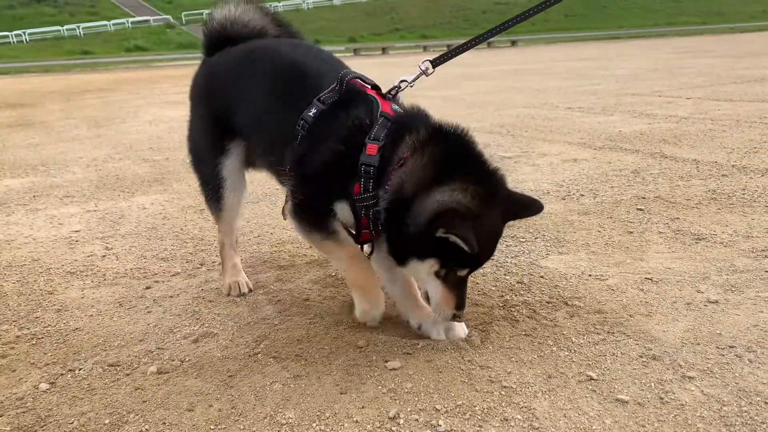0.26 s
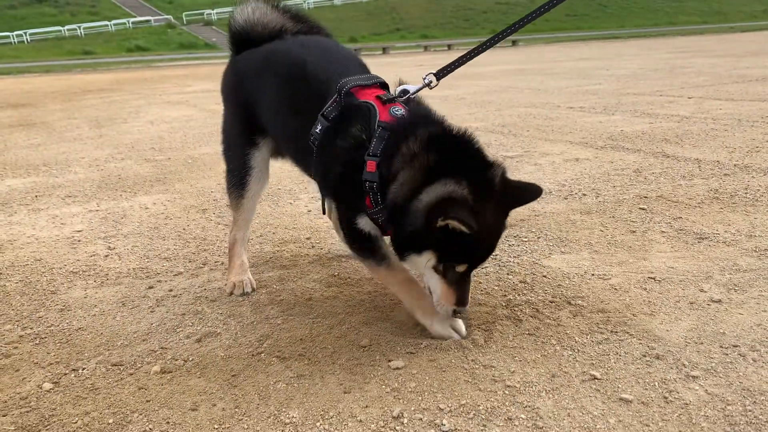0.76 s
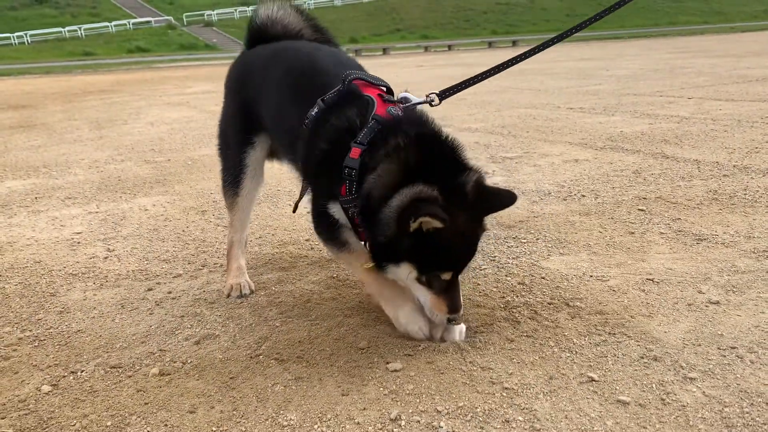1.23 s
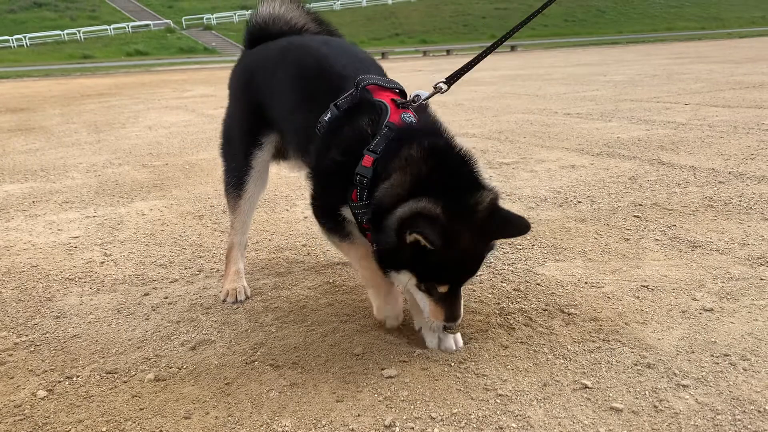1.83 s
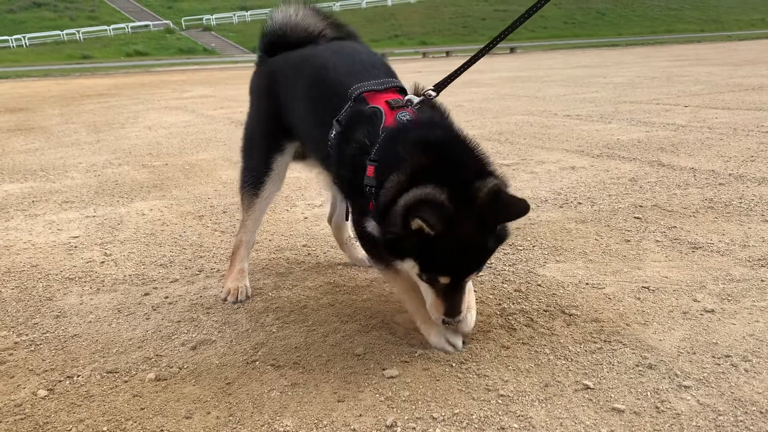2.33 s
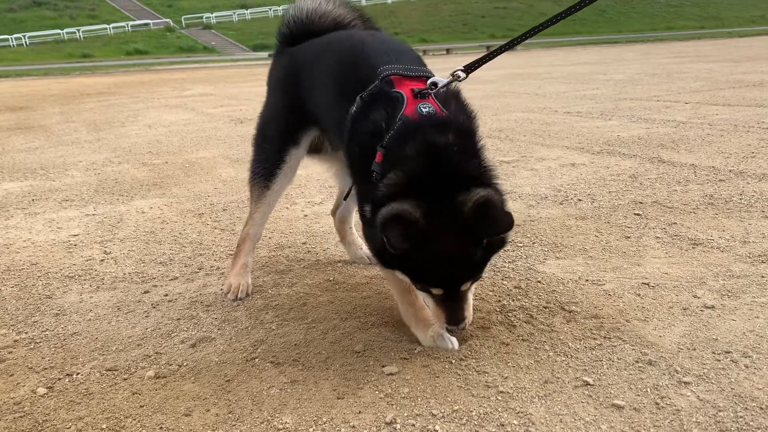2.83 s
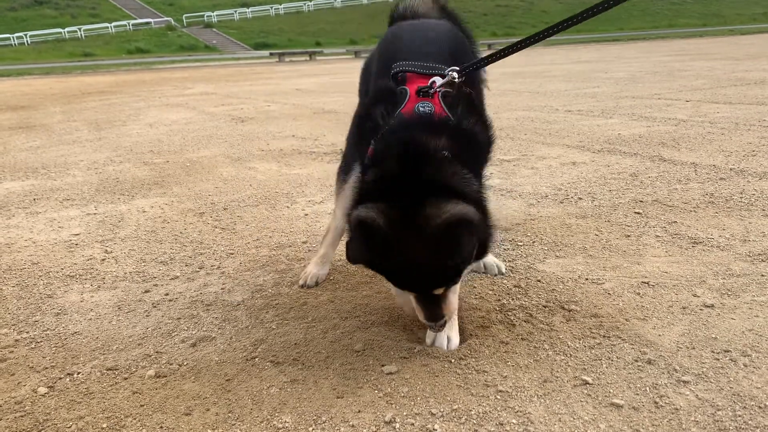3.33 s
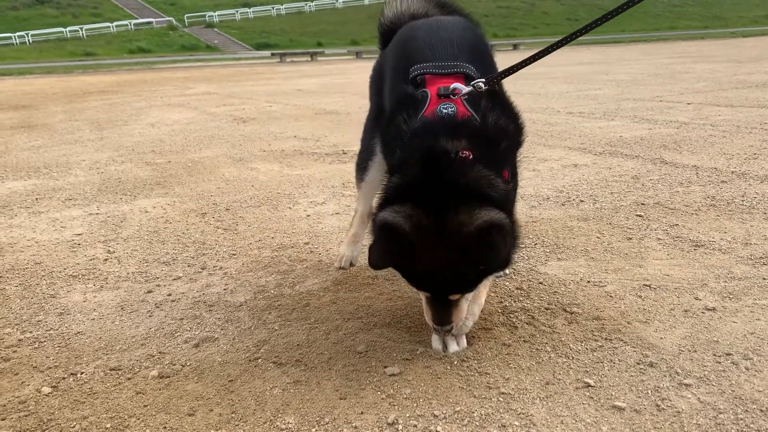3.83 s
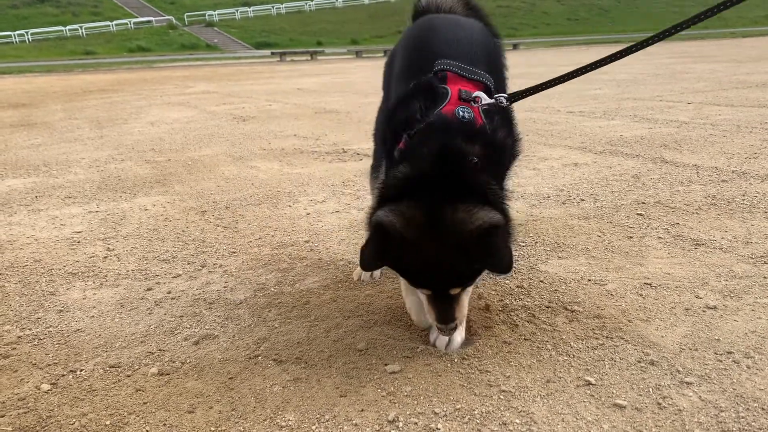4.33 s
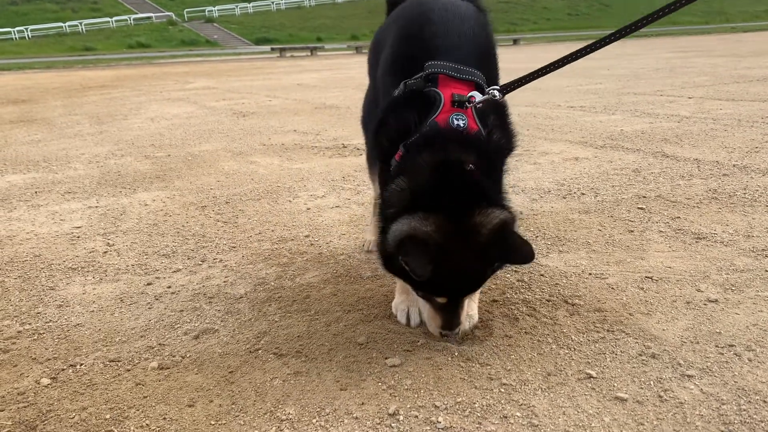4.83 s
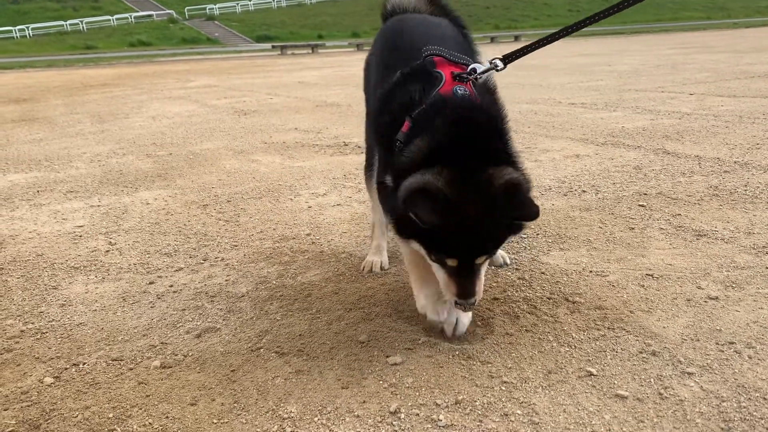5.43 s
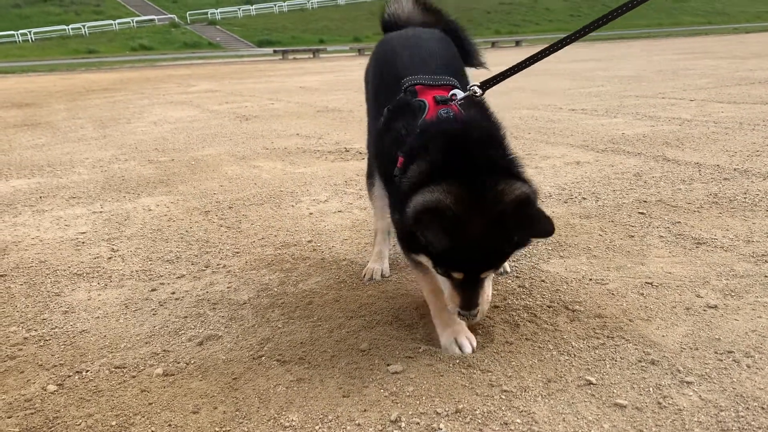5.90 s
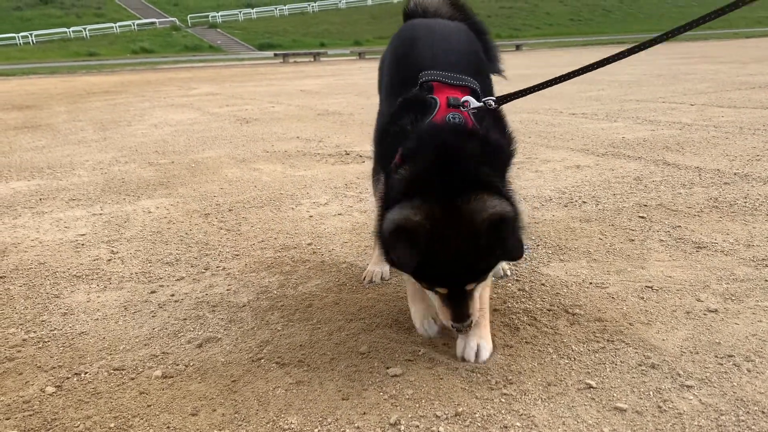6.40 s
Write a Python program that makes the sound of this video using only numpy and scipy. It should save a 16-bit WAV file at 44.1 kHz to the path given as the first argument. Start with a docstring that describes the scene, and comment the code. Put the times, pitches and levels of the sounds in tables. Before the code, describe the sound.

Close stereo pickup of claws scratching gravelly sand in an open place: crisp, swelling and dying sprays in a brisk, slightly uneven rhythm. Small stones click, one knock standing out near the middle, and a metal clasp tinkles lightly. Low wind flutters and bumps against the microphone throughout, above dull distant traffic-like drone and soft hiss. After a brief pause in the scratching, a bird chirps quickly and the digging continues to the end.

```python
"""A dog on a lead digs at dry gravelly ground: each paw stroke is a swelling and dying spray of
ringing grains, fine for sand and coarse for gravel. Pebbles click as short knocks with a bright tick,
and the metal clasp of the lead tinkles as a set of decaying modes. Wind, made of coloured noise and
sagging low swings, buffets two microphone ports over a distant drone of dull grains and faint hiss.
A small bird twitters once in gliding whistles."""
import sys
import numpy as np
from scipy import signal
from scipy.fft import rfft, irfft, next_fast_len
from scipy.io import wavfile
from scipy.ndimage import uniform_filter1d

SR = 44100
rng = np.random.default_rng(int(sys.argv[2]) if len(sys.argv) > 2 else 0)


def generate_wav(sig):
    """Save sig (samples, or channels by samples) to the path in sys.argv[1] as 16-bit PCM at SR."""
    pcm = np.round(np.clip(np.atleast_2d(sig).T, -1, 1) * 32767).astype(np.int16)
    wavfile.write(sys.argv[1], SR, pcm)


N = 293706
TIME = np.arange(N) / SR
SIZE = next_fast_len(N)
FREQ = np.maximum(np.fft.rfftfreq(SIZE, 1 / SR), 1)

# paw strokes: (start [s], nominal length [s], sand level [dB], gravel level [dB])
STROKES = [(0, 0.076, -52.5, -53), (0.136, 0.1, -52, -49), (0.32, 0.067, -47.5, -54),
           (0.467, 0.077, -47.5, -49), (0.614, 0.052, -43.5, -49.5), (0.763, 0.071, -49, -53.5),
           (0.905, 0.074, -48, -56), (1.036, 0.14, -46, -52.5), (1.203, 0.077, -48, -50.5),
           (1.386, 0.045, -47.5, -46.5), (1.46, 0.061, -54, -77), (1.547, 0.062, -50.5, -52.5),
           (1.727, 0.04, -46.5, -47.5), (1.852, 0.06, -48, -50), (2.02, 0.084, -48.5, -51.5),
           (2.14, 0.093, -40, -47.5), (2.302, 0.08, -50, -52.5), (2.47, 0.049, -43.5, -50.5),
           (2.593, 0.1, -52.5, -55), (2.76, 0.06, -47, -51.5), (2.926, 0.063, -49, -53.5),
           (3.07, 0.045, -46.5, -50.5), (3.209, 0.088, -52, -55.5), (3.348, 0.076, -43.5, -48.5),
           (3.452, 0.059, -53.5, -59.5), (3.52, 0.064, -51, -56), (3.662, 0.066, -49.5, -51.5),
           (3.834, 0.063, -53, -52.5), (3.991, 0.082, -50, -55), (4.187, 0.056, -55, -54.5),
           (4.329, 0.051, -46, -49), (4.503, 0.16, -47, -54.5), (4.802, 0.18, -76, -71.5),
           (5.295, 0.054, -64.5, -67), (5.381, 0.086, -50, -50.5), (5.564, 0.075, -44, -52.5),
           (5.767, 0.062, -48, -49.5), (5.914, 0.087, -52, -54.5), (6.086, 0.061, -48, -49.5),
           (6.242, 0.069, -52.5, -54), (6.416, 0.053, -52.5, -54.5), (6.592, 0.071, -53, -58.5)]
# colour of sprayed sand, shared by the clasp's crack: (frequency [Hz], relative density [dB per Hz])
SAND_COLOUR = [(3000, -8.5), (5000, -33), (6200, -11.5), (7500, -15.5), (8500, -3.5), (10000, 0),
               (11500, -5.5), (12500, -6.5), (14000, -9.5), (15700, -10.5), (16050, -61)]


def undb(db):
    """Gain of a level in dB."""
    return 10 ** (np.asarray(db) / 20)


def across(table):
    """Columns of a (frequency, ..) table, interpolated over log frequency."""
    hz, *columns = np.transpose(table)
    return [np.interp(np.log(FREQ), np.log(hz), column) for column in columns]


def along(table):
    """Columns of a (time, ..) table, interpolated over the time axis."""
    s, *columns = np.transpose(table)
    return [np.interp(TIME, s, column) for column in columns]


def colour(x, spectrum):
    """Gives a white signal a spectrum at the same power; it keeps falling past its last point."""
    gain = undb(across(spectrum)[0])
    gain = gain * np.minimum(1, spectrum[-1][0] / FREQ) ** 4
    gain = gain / np.sqrt(np.mean(gain ** 2))
    return irfft(rfft(x, SIZE) * gain, SIZE)[..., :N]


def ports(three, table):
    """Row 0 reaches both ports with a phase lag; rows 1 and 2 reach one port each."""
    lead, pan_db, share = across(table)
    share = np.clip(share, 0, 1)
    common, *own = rfft(three, SIZE)
    heard = []
    for k, side in enumerate((1, -1)):  # left, right
        together = np.sqrt(share) * np.exp(.5j * side * lead) * common
        alone = np.sqrt(1 - share) * own[k]
        heard.append(irfft(undb(side * pan_db / 2) * (together + alone), SIZE)[:N])
    return np.array(heard)


def walk(rate):
    """Random levels held 1 / rate s and slewed twice; spread near 1."""
    k = int(SR / rate)
    held = np.repeat(rng.standard_normal(N // k + 1), k)
    return 2.42 * uniform_filter1d(uniform_filter1d(held, k), k)[:N]


def grains(low_hz, top_hz, rate, scatter_db, cycles, patchy_db, count):
    """Three rows of clicks ringing a few cycles, each pitch in its own patches; dense as unit white noise."""
    out = 0
    size = int(rate * N / SR)
    for hz in np.geomspace(low_hz, top_hz, count):
        clicks = np.zeros((3, N))
        at = rng.integers(0, N, (3, size))
        # a few grains strike far harder than the rest
        force = rng.standard_normal((3, size)) * undb(scatter_db * rng.exponential(size=(3, size)))
        np.put_along_axis(clicks, at, force, axis=1)
        ring = signal.lfilter(*signal.iirpeak(hz, cycles, SR), clicks)
        out = out + ring * np.sqrt(hz / np.mean(ring ** 2)) * undb(patchy_db * walk(55))
    width = np.mean((FREQ > low_hz) & (FREQ < top_hz))
    return out * np.sqrt(width / np.mean(out ** 2))


def add(out, s, sound):
    """Mixes a short sound in at a time."""
    i = int(s * SR)
    out[..., i:i + sound.shape[-1]] += sound[..., :max(N - i, 0)]


def drone(hiss_mean_db=-59.5, hiss_follows=0.12):
    """A dull far drone, perhaps traffic, whose bands waver alone, and a faint smooth hiss above it."""
    # drift of the drone: (time [s], level [dB])
    drone_level = [(0, -43.5), (1.5, -41.5), (2.2, -41), (2.7, -44.5), (3.3, -45), (4.4, -45.5),
                   (5.05, -48), (6.66, -50)]
    # colour of the drone: (frequency [Hz], relative density [dB per Hz])
    drone_colour = [(150, -4.5), (300, -7.5), (480, 1), (700, -3.5), (950, -10.5), (1300, -24.5),
                    (2500, -81)]
    # colour of the hiss: (frequency [Hz], relative density [dB per Hz])
    hiss_colour = [(600, -8), (1200, -4), (2000, -3), (3000, -12), (4500, -17.5), (6000, -27.5),
                   (8000, -41.5), (12000, -41), (14000, -62)]
    db, = along(drone_level)
    bands = grains(144.4, 2655, 1500, scatter_db=1.1, cycles=5.5, patchy_db=1.5, count=12)
    low = colour(bands, drone_colour) * undb(db + 0.5 * walk(3.98))
    # hiss_follows: dB the hiss moves per dB of drone
    hiss_db = hiss_mean_db + hiss_follows * (db - db.mean())
    hiss = colour(rng.standard_normal((3, N)), hiss_colour) * undb(hiss_db + 0.4 * walk(6.3))
    return low + hiss


def wind(flutter_mean_db=-46, flutter_follows=0.78, cycles=1.09, edge_s=0.0095, brief=2.23, snap_db=11, sag=0.1):
    """Turbulent rumble and flutter; single eddies slap the ports and swing out, sagging in pitch."""
    # wind on the ports: (time [s], rumble level [dB])
    rumble_level = [(0, -35.5), (.2, -38), (.33, -29.5), (.76, -34), (1.2, -36.5), (2.11, -36),
                    (2.39, -39.5), (2.76, -37), (3, -45), (3.11, -36.5), (3.76, -40), (4.12, -37),
                    (4.25, -40.5), (4.67, -40), (4.9, -40), (5.25, -44.5), (5.4, -37), (6.25, -38.5),
                    (6.66, -35.5)]
    # colour of the rumble: (frequency [Hz], relative density [dB per Hz])
    rumble_colour = [(15, -51), (28, -22), (45, -3.5), (60, 0), (100, -4), (140, -10), (250, -24),
                     (500, -78)]
    # colour of the flutter: (frequency [Hz], relative density [dB per Hz])
    flutter_colour = [(60, -28), (120, -4.5), (160, 1), (250, -1.5), (350, -9.5), (600, -15.5), (1200, -51)]
    # colour of an eddy's sharp edge: (frequency [Hz], relative density [dB per Hz])
    edge_colour = [(80, -44.5), (170, -3.5), (280, -3), (450, -9.5), (800, -26), (1500, -51)]
    # eddies: (time [s], swing level [dB], mean pitch up to the crest at `cycles` turns [Hz], edge level [dB])
    buffets = [(0.297, -27, 112, -34.5), (.326, -27, 59.6, -27.5), (0.37, -35, 60, -33),
               (.556, -28, 105, -31.5), (.632, -27.5, 101.4, -31.5), (.706, -23, 64, -54),
               (0.914, -27.5, 90.5, -52), (0.966, -28, 85.5, -40), (1.575, -29, 87.4, -31.5),
               (1.755, -33, 100, -48), (2.129, -25.5, 71.5, -40.5), (2.45, -24.5, 66, -66),
               (2.735, -28.5, 105.6, -31), (3.025, -40, 68.6, -43), (3.277, -27, 103, -37.5),
               (3.446, -38, 152, -38.5), (3.614, -26, 114, -64), (3.952, -34, 110, -40),
               (4.073, -26, 73, -42), (4.194, -30, 99, -41), (4.466, -34, 57.7, -44),
               (4.856, -29, 149, -34), (4.866, -26.5, 66.7, -64), (5.073, -45, 111, -46),
               (5.355, -31, 112, -46), (5.453, -32, 58.5, -48), (5.515, -31.5, 54, -43),
               (5.888, -29.5, 90, -37.5), (6.595, -30, 69, -44.5)]
    db, = along(rumble_level)
    rumble = colour(rng.standard_normal((3, N)), rumble_colour) * undb(db + 1.28 * walk(14))
    # flutter_follows: dB the flutter moves per dB of rumble
    flutter_db = flutter_mean_db + flutter_follows * (db - db.mean())
    flutter = colour(rng.standard_normal((3, N)), flutter_colour) * undb(flutter_db + 1.76 * walk(30))
    eddies, edges, snaps = np.zeros((3, N)), np.zeros(N), np.zeros(N)
    t = TIME[:5000]
    for s, swing_db, hz, edge_db in buffets:
        crest_s = cycles / hz
        turn = hz * t / cycles  # 1 at the crest of the swing
        phase = 2 * np.pi * rng.random() + 0.64 * rng.standard_normal((3, 1))
        swing = np.cos(2 * np.pi * hz * t * (1 + sag) / (1 + sag * turn) + phase)
        envelope = (turn * np.exp(1 - turn)) ** brief
        add(eddies, s, undb(swing_db) * swing * envelope)
        add(edges, s, undb(edge_db) * np.minimum(turn, 1) * np.exp(-((t - crest_s) / edge_s) ** 2))
        # the pressure also snaps once at the crest
        add(snaps, s + crest_s, undb([edge_db + snap_db]) * np.sign(np.cos(phase.mean())))
    sharp = edges * colour(rng.standard_normal((3, N)), edge_colour) + colour(snaps, edge_colour)
    return rumble + flutter + eddies + sharp


def bird(pan_db=-3):
    """Quick, slightly hoarse gliding whistles, a little to the right."""
    # notes: (start [s], length [s], start pitch [Hz], end pitch [Hz], level before panning [dB])
    notes = [(5.289, .016, 4300, 5600, -64), (5.302, .012, 5600, 3800, -65), (5.316, .016, 4600, 4250, -64),
             (5.343, .018, 3550, 3500, -65), (5.358, .014, 3700, 4400, -68)]
    out = np.zeros(N)
    for s, length, hz, end_hz, db in notes:
        ramp = np.linspace(0, 1, int(length * SR))
        hoarse_db = 2 * walk(470)[:len(ramp)]
        waver_hz = 90 * walk(560)[:len(ramp)]
        glide_hz = hz + (end_hz - hz) * ramp + waver_hz
        whistle = np.sin(2 * np.pi * np.cumsum(glide_hz) / SR)
        add(out, s, undb(db + hoarse_db) * np.sin(np.pi * ramp) * whistle)
    return out * undb([[pan_db / 2], [-pan_db / 2]])


def rattle(under_db=-15, shiver_s=0.047, count=3):
    """Faint extra clasp taps shaken loose by each stroke, louder with a strong one."""
    chance = rng.random((len(STROKES), count, 3))
    start, _, sand_db, _ = np.transpose(STROKES)[..., None]
    s = start + shiver_s * chance[..., 0]
    db = sand_db + under_db + 12 * (chance[..., 1] - .5)
    ring_db = -25 + 15 * chance[..., 2]
    return list(zip(s.ravel(), db.ravel(), ring_db.ravel()))


def clasp(crack_db=-6, gentle_db=-51.0, choke_s=0.014):
    """Each tap rings the same metal modes in new proportions, with a noisy crack of contact."""
    # modes of the clasp: (frequency [Hz], relative level [dB], 60 dB decay [s])
    clasp_modes = [(4759, -23, .15), (9929, 0, .13), (11150, -9, .025), (12160, -13, .04)]
    # modes of the harness ring it knocks against: (frequency [Hz], relative level [dB], 60 dB decay [s])
    ring_modes = [(6943, 2, .12), (14420, 2, .04)]
    # taps: (time [s], level [dB], ring over clasp [dB])
    taps = [(.0573, -37, -19), (.2748, -48, -29), (.298, -45.5, -31), (.335, -48, -25), (.3576, -44, -21),
            (.4725, -28.5, -28), (.6365, -27.5, -14), (.652, -39, -25), (1.017, -41.5, -25),
            (1.1029, -45.5, -15), (1.144, -39, 7), (1.157, -47.5, 12), (1.2, -49, -14),
            (1.2855, -47.5, -27), (1.463, -47, -17), (1.4916, -41, -6), (1.508, -50, 6), (1.522, -52, -25),
            (1.799, -51.5, -25), (1.8328, -48, 9), (1.842, -46, -25), (2.3261, -43, -12), (2.368, -46, -26),
            (2.4644, -34, 1), (2.535, -53, -25), (2.751, -46, -23), (2.977, -48, -24), (3.036, -54.5, -25),
            (3.0839, -42, -16), (3.166, -53, -25), (3.5309, -48.5, -25), (3.6581, -43, -17),
            (3.885, -53, -25), (3.9245, -54, -20), (3.94, -63, -25), (3.9558, -56, -25),
            (4.3505, -37.5, -11), (4.383, -55, -25), (4.443, -48.5, -11), (4.46, -58, -25),
            (4.799, -57, -34), (5.4178, -37, -8), (5.7957, -46, -3), (6.1639, -50, -23),
            (6.488, -47.5, -25), (6.5553, -47.5, -30)]
    tones, cracks = np.zeros((3, N))[:2]
    t = TIME[:3000, None]
    hz, mode_db, t60 = np.transpose(clasp_modes + ring_modes)
    of_ring = np.arange(len(hz)) >= len(clasp_modes)
    for s, db, ring_db in list(taps) + rattle():
        chance = rng.standard_normal((3, len(hz)))
        share = undb(mode_db + 0.55 * chance[0] + ring_db * of_ring)
        # gentle taps wake the highest modes less
        share = share * undb(0.325 * min(db - gentle_db, 0) * (hz > clasp_modes[1][0]))
        pitch = hz * (1 + 0.00072 * chance[1])
        ring = share * np.sin(2 * np.pi * pitch * t + 3 * chance[2]) * 1000 ** (-t / t60)
        onset = 1 - np.exp(-t / .0008)
        # the parts touch again after a moment, which chokes the ring
        choke = 1 + np.exp((t - choke_s * (1 + .25 * chance[0, 0])) / .003)
        add(tones, s, undb(db) * (ring * onset / choke).sum(axis=1))
        crack = rng.standard_normal(len(t)) * 1000 ** (-t[:, 0] / 0.024)
        add(cracks, s, undb(db + crack_db) * crack)
    return np.tile(tones + colour(cracks, SAND_COLOUR), (3, 1))


def pebbles(body_hz=3100):
    """Claws knock single pebbles: a dry, fast-dying stony knock and a bright tick."""
    # knocks: (time [s], body level [dB], treble over body [dB])
    knocks = [(.165, -33, -12), (0.472, -40, 3), (.6149, -46, 12), (.7627, -33, -9), (1.0595, -32, -14),
              (1.1432, -46, 14), (1.3837, -56, 2), (1.728, -42, -13), (1.8325, -47, 14), (2.172, -43, 6),
              (2.465, -42, 15), (2.5643, -32, -19), (2.578, -39, -10), (2.8923, -21.5, -15),
              (2.8958, -28, -19), (2.908, -32, -14), (2.9376, -42, 11), (3.0669, -41, -3),
              (3.4802, -35.5, 6.5), (3.831, -42, -3), (4.1922, -36.5, -12), (4.3514, -35, -4),
              (5.3965, -33, -15), (5.4615, -37, -20), (5.474, -28, -14), (5.4775, -27, -24),
              (5.4835, -33, -20), (5.754, -35, 1), (6.077, -44, 15), (6.1188, -38, -17), (6.414, -35.5, 1),
              (6.584, -39, -12.5)]
    out = np.zeros((3, N))
    t = TIME[:1000]
    for (s, db, treble_db), pitch in zip(knocks, rng.standard_normal(len(knocks))):
        body = np.sin(2 * np.pi * body_hz * (1 + .04 * pitch) * t) * 1000 ** (-t / .004)
        # an impulse and a burst of noise
        strike = (2.2 * (t == 0) + 0.86 * rng.standard_normal(len(t))) * 1000 ** (-t / 0.0044)
        tick = signal.lfilter(*signal.iirpeak(7500, .75, SR), strike)
        add(out, s, undb(db) * (body + undb(treble_db) * tick))
    return out


def digging(rise_share=0.42, trickle_db=-15, trickle_t60_s=0.3, drag_s=0.0038, bite=1.06, square=2.31,
            crackle_db=-9):
    """Every stroke swells and dies as a spray of grains; thrown sand trickles down after it."""
    # colour of dragged gravel: (frequency [Hz], relative density [dB per Hz])
    gravel_colour = [(600, -6.5), (1200, 2.5), (1900, -1.5), (2400, -7), (3100, -1), (4000, -5.5),
                     (5200, -10), (6500, -10), (9000, -11)]
    sand, gravel = np.zeros(N), np.zeros(N)  # power envelopes
    for s, length, sand_db, gravel_db in STROKES:
        rise, fall = rise_share * length, (1 - rise_share) * length
        since = TIME - s - rise
        sand_span = np.where(since < 0, rise, fall)
        sand += undb(2 * sand_db) * np.exp(-(abs(since) / sand_span) ** square)
        # the claws reach the gravel a moment after the pads stir the sand
        gravel_span = np.where(since < drag_s, rise, fall)
        gravel += undb(2 * gravel_db) * np.exp(-(bite * (since - drag_s) / gravel_span) ** 2)
    keep = np.exp(-2 * np.log(1000) / (trickle_t60_s * SR))
    trickle = undb(2 * trickle_db) * signal.lfilter([1 - keep], [1, -keep], sand)
    # the claws catch and slip, so the spray comes in lumps
    slip = walk(70)
    spray = sand * undb(2.0 * slip)
    # sparser, drier clicks of larger stones cracking loose
    crackle = undb(crackle_db) * grains(1500, 7000, 45, scatter_db=2.0, cycles=2.1, patchy_db=1.0, count=5)
    fine = grains(3440, 18700, 1200, scatter_db=1.5, cycles=8.7, patchy_db=2.5, count=14)
    coarse = grains(950, 8080, 600, scatter_db=1.65, cycles=15.3, patchy_db=1.52, count=20)
    sprayed = colour(fine * np.sqrt(spray + trickle), SAND_COLOUR)
    dragged = colour((coarse + crackle) * np.sqrt(gravel) * undb(1.45 * slip), gravel_colour)
    return sprayed + dragged


def scene(rasp_hz=5250, rasp_sharpness=3.5):
    """Near sounds from the ground and far sounds with the wind meet the two ports differently."""
    # ports, near sound: (frequency [Hz], left phase lead [rad], left minus right [dB], share in common [0-1])
    near_ports = [(600, -1.8, 0, .5), (1500, -2.8, 0, .5), (2000, -6.3, -1, .6), (3000, -5.3, -2, .8),
                  (4000, -6.2, -1, .75), (4500, -5.9, -1, .4), (4850, -3.7, -.5, .7),
                  (5600, -3.2, -.5, .93), (5900, -4.8, -1, .15), (6200, -6.2, 0, .45), (6900, -6.3, 0, .65),
                  (7400, -7.8, 0, .3), (8200, -9.3, 0, .995), (8900, -9.6, 0, .995), (10600, -12.4, 0, .98),
                  (11500, -12.8, 0, .98), (12500, -14.6, 0, .8), (13000, -15.6, 0, .995),
                  (13900, -15.9, 0, .995), (15000, -18.4, 0, .8), (15700, -18.85, 0, .99)]
    # ports, wind and far sound: (frequency [Hz], left phase lead [rad], left minus right [dB], share [0-1])
    far_ports = [(60, -0.5, 0.17, 0.87), (252, 0.5, 0.028, 0.51), (470, -1, .5, 0.45), (737, -2, 0.7, 0.41),
                 (1840, -2, 0.62, 0.54), (2560, -1, -.5, 0.21), (8000, 6, 0.08, 0.4)]
    # lift of the rasp band at the right port as the dog stands side on: (time [s], lift [dB])
    rasp_lift = [(0, 10.5), (1, 6), (2.3, 1), (4.7, -3), (5.4, 2.5), (6.66, 4)]
    left, right = ports(digging() + pebbles() + clasp(), near_ports)
    rasp = signal.lfilter(*signal.iirpeak(rasp_hz, rasp_sharpness, SR), right)
    near = np.array([left, right + (undb(along(rasp_lift)[0]) - 1) * rasp])
    return near + ports(wind() + drone(), far_ports) + bird()


def record(dry, top_hz=16400):
    """The recorder cuts the top with a steep low-pass."""
    return signal.sosfilt(signal.ellip(8, .2, 70, top_hz, fs=SR, output="sos"), dry)


dry = scene()
out = record(dry)
generate_wav(out)
```